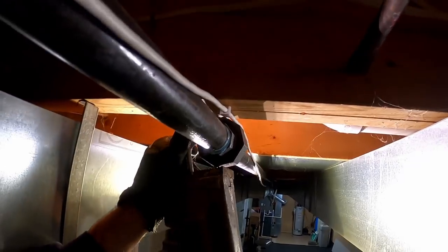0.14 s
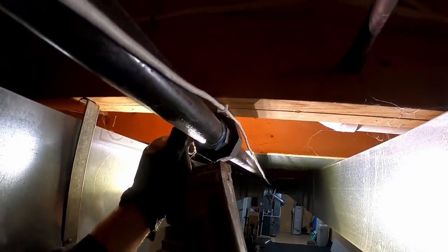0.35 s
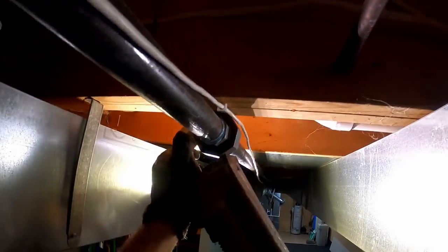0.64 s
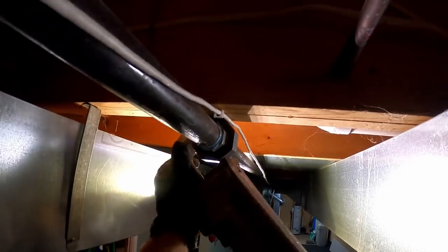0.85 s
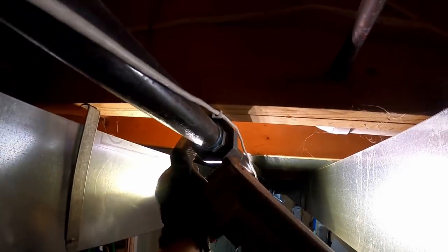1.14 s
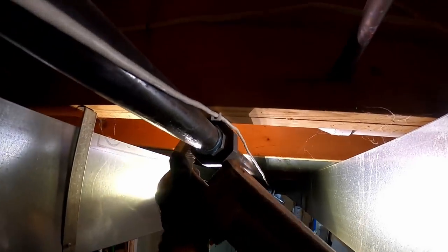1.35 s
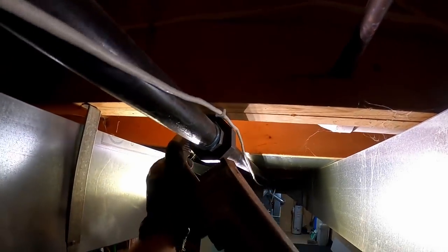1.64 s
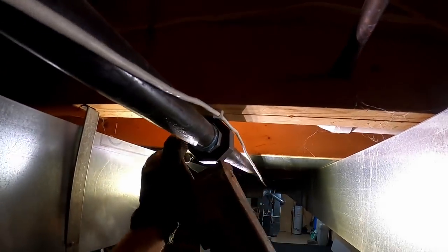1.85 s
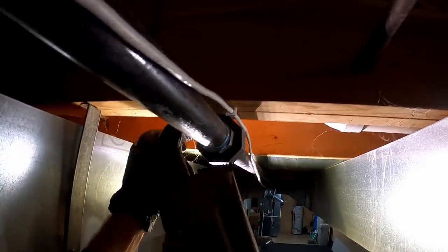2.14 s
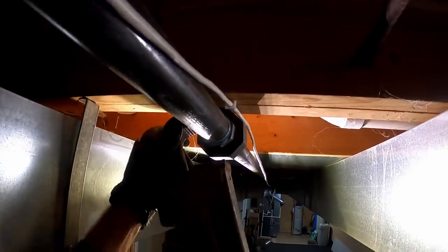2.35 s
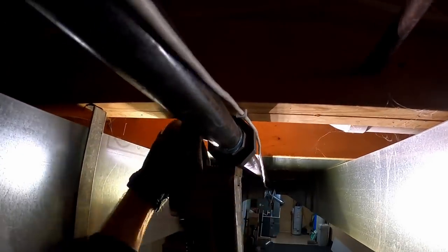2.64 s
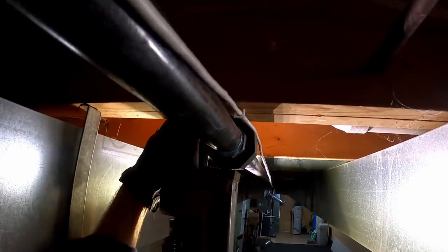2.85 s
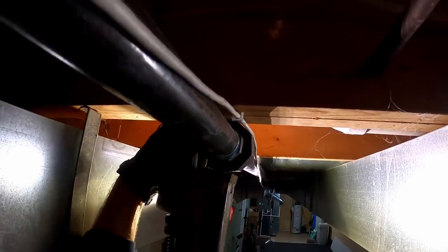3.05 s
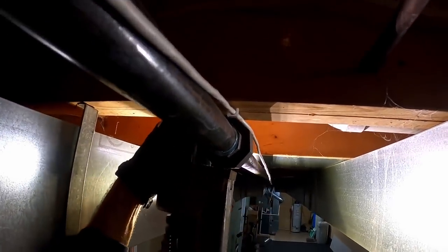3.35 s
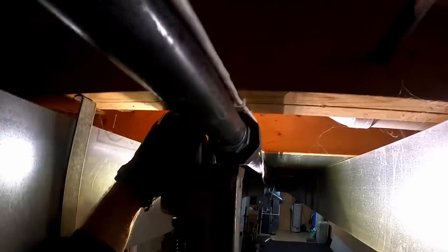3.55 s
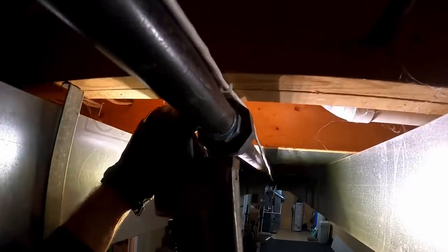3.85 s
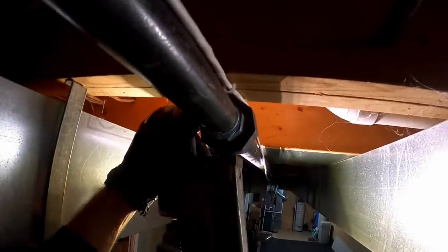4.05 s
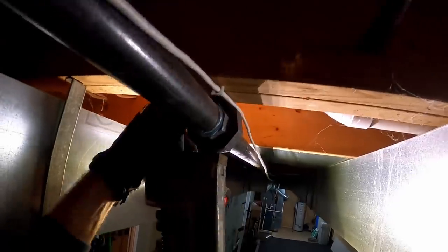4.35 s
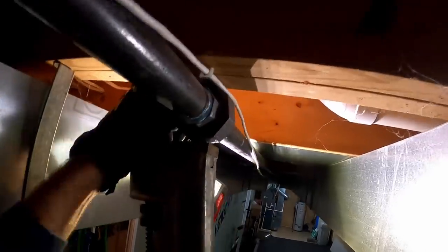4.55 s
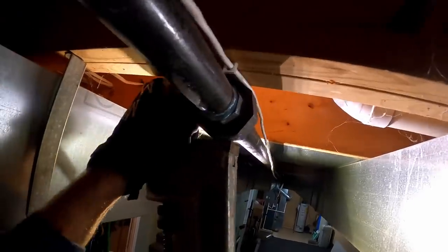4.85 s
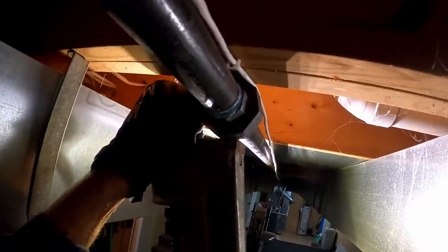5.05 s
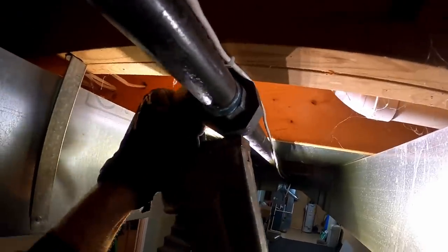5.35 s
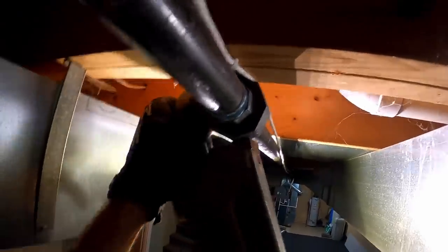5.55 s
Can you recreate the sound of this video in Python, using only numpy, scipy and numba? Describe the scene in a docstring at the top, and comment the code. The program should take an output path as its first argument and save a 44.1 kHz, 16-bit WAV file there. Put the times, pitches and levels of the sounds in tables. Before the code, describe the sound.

Close, dry stereo sound of wrench jaws on threaded pipe: an opening scrape, a stuttering squeak, a lull, then a sharp bite and ratchety grind. The loudest metal blows land just after the middle of the first half ends and shake the joists dully. Afterwards come sparse clicks, light scuffs, rough squeaks and glove rubbing over steady faint hiss.

```python
"""In a cramped loft, a pipe wrench works a threaded iron pipe between joists, close to a small stereo microphone.
Each pull shakes the joists low and dull: noise and sudden pushes ring the low modes of the timber.
Gloves rub along and the jaws rasp, scuff and knock: random grains and bursts ring wood and iron resonances.
The thread squeaks as it sticks and slips, built from harmonics of a wobbling pitch.
Short diffuse echoes answer; a steady hiss lies beneath and the image flutters between left and right."""
import sys
import numpy as np
from scipy import signal
from scipy.fft import rfft, irfft, next_fast_len
from scipy.io import wavfile
from scipy.ndimage import uniform_filter1d
from numba import njit

SR = 44100
rng = np.random.default_rng(int(sys.argv[2]) if len(sys.argv) > 2 else 0)


def materialize(psi):
    """Save the field psi as 16-bit PCM at rate SR to the path in sys.argv[1].

    A 1-D psi becomes a single channel; in a 2-D psi each row is a channel.
    """
    bounded = np.clip(np.atleast_2d(psi).T, -1, 1)
    quanta = np.round(bounded * 32767).astype(np.int16)
    wavfile.write(sys.argv[1], SR, quanta)


N = 250929
T = np.arange(N) / SR
MS = np.arange(0, N / SR + .002, .001)  # the same span in millisecond steps, in seconds
DRIFT = .018  # scale of the wander of the resonances, as a share of their pitch


def undb(db):
    """Decibels to an amplitude factor."""
    return 10 ** (np.asarray(db) / 20)


def unit(x):
    """Scale to an RMS of one."""
    return x / np.sqrt(np.mean(x ** 2))


def curve(table, index):
    """One column over time, joined by straight lines."""
    rows = np.array(table, float)
    return np.interp(T, rows[:, 0], rows[:, index])


def gate(table, fade_s=0.0052):
    """One while the table lasts, fading at both ends."""
    since_start, until_end = T - table[0][0], table[-1][0] - T
    return np.clip(np.minimum(since_start, until_end) / fade_s, 0, 1)


def swells(s, db, rise_s, hold_s, fade_s):
    """Power of each event once a millisecond: rise to the peak, hold, then a steady fade."""
    late = MS[:, None] - s
    # rises are kept within 2 to 500 ms per 30 dB, fades at 20 ms or more per 60 dB
    rise_db = -30 * late / np.clip(rise_s, .002, .5)
    fade_db = 60 * (late - hold_s) / np.maximum(fade_s, .02)
    below_db = np.clip(np.maximum(rise_db, fade_db), 0, 200)
    return undb(db - below_db) ** 2


def gain(power):
    """Overlapping events add in power; the amplitude follows at sample rate."""
    return np.interp(T, MS, np.sqrt(power.sum(axis=1)))


@njit
def svf(x, hz, width):
    """State-variable band-pass, gain 1 at a centre that may move."""
    y, b, l = np.empty(len(x)), 0., 0.  # output, band and low states
    for i in range(len(x)):
        g, k = np.tan(np.pi * hz[i] / SR), width / hz[i]
        v = (b + g * (x[i] + 1e-18 - l)) / (1 + g * (g + k))
        b, l, y[i] = 2 * v - b, l + 2 * g * v, k * v
    return y


def body(x, modes, stretch=None, steep=False):
    """Sum of resonances, all scaled by a common stretch; steep ones pass a second, wider filter."""
    out = 0
    for k, (hz, width, db) in enumerate(modes):
        centre = np.full(len(x), 1. * hz) if stretch is None else np.clip(hz * stretch, 20, SR / 2.5)
        y = svf(x, centre, 1. * width)
        if steep:
            y = svf(y, centre, 1.76 * width)
        out = out + (-1) ** k * undb(db) * y  # neighbours alternate in sign
    return out


def tilted(modes, tilt_db):
    """The same modes, brighter or duller by dB per octave from 2 kHz."""
    return [(hz, width, db + tilt_db * np.log2(hz / 2000)) for hz, width, db in modes]


def walk(rate):
    """Random levels held 1 / rate s and slewed twice; spread near 1."""
    k = int(SR / rate)
    held = np.repeat(rng.standard_normal(N // k + 1), k)
    return 1.26 * uniform_filter1d(uniform_filter1d(held, k), k)[:N]


def grains(rate, spread_db, flicker_db):
    """Tiny slips of rough surfaces: random clicks (rate per s) of uneven size whose strength flickers."""
    hit = rng.random(N) < rate / SR
    size = undb(spread_db * rng.exponential(size=N)) * rng.standard_normal(N)
    return unit(hit * size * undb(flicker_db * walk(40)))


def steady_hiss():
    """Steady broad noise round 2.5 kHz, unrelated left and right."""
    level_db = -67.5  # before the filter
    noise = rng.standard_normal(2 * N)
    return undb(level_db) * svf(noise, np.full(2 * N, 2500.), 3600.0).reshape(2, N)


def joists():
    """Heaves shake each low timber mode on its own; jolts ring them all over a slowly swelling rumble."""
    # Low modes of the timber frame. Each row: centre in Hz, width in Hz, level in dB.
    joist_modes = [(64.3, 17.7, 1), (82.7, 8.2, 0.5), (97.4, 19.3, 2.5), (122.4, 18.7, 5), (150.2, 23, -3),
                   (170.8, 16.3, 0.5), (204.6, 30.3, -3)]
    # Heaves on the handle. Each row: peak in seconds, level at 120 Hz in dB, hold in seconds,
    # fade in seconds per 60 dB, tilt in dB per octave.
    heave_rows = [(0, -30, 0.04, 2.5, -1.5), (0.523, -26.5, 0.011, 1.3, -5.5),
                  (0.894, -37.5, 0.026, 2.5, -2), (1.637, -27, 0.099, 1, 10.5),
                  (1.797, -22, 0.072, 1.06, 0), (2.05, -23.5, 0.02, 0.5, 1.5),
                  (2.132, -24, 0.069, 0.5, -3.5), (2.317, -27.5, 0.073, 1.4, 3), (2.609, -18, 0.16, 1, 2),
                  (2.868, -21, 0.026, 2, 0.5), (3.832, -46.5, 0.12, 5.5, 5.5), (4.489, -37, 0.021, 1.6, 2),
                  (4.815, -21, 0.029, 0.19, -8.5), (4.872, -26, 0.077, 0.93, -11),
                  (5.198, -41, 0.36, 2.5, -3.5)]
    # Heavy jolts into the joists. Each row: time of the push in seconds, peak in dB.
    jolt_rows = [(0.514, -19), (1.631, -23), (2.042, -20), (2.316, -20.5), (2.608, -11), (2.655, -15.5),
                 (2.686, -18.5), (2.751, -21), (2.9, -9.5), (3.828, -35.5), (4.81, -23), (4.857, -30.5)]
    heave_rise_s = 0.035  # per 30 dB
    rumble_hz, rumble_width_hz, rumble_db = 53, 40, -43

    s, level_db, hold_s, fade_s, tilt_db = np.transpose(heave_rows)
    modes = [body(rng.standard_normal(N), [mode], steep=True) for mode in joist_modes]
    shake = 0
    for y, (hz, width, db) in zip(modes, joist_modes):
        mode_db = level_db + tilt_db * np.log2(hz / 120)
        shake = shake + y * gain(swells(s, mode_db, heave_rise_s, hold_s, fade_s))
    shake = shake / np.std(sum(modes))

    push, t = np.zeros(N), np.arange(SR // 4) / SR
    for s, db in jolt_rows:
        push[int(s * SR)] = undb(db)
    ring = sum(undb(db) * np.sin(2 * np.pi * hz * t) * np.exp(-np.pi * 1.5 * width * t)
               for hz, width, db in joist_modes)
    # the push reaches the timber 5 ms late and lasts about 3 ms
    ring = uniform_filter1d(np.r_[np.zeros(SR // 200), ring], size=120)
    jolts = signal.fftconvolve(push, ring / np.abs(ring).max())[:N]

    rumble = body(rng.standard_normal(N), [(rumble_hz, rumble_width_hz, 0)], steep=True)
    rumble = unit(rumble * undb(2.0 * walk(3.4))) * undb(rumble_db)
    return shake + jolts + rumble


def rubbing():
    """Gloves and jaws rub wood and iron: grains ring dull wood, gritty iron and its finer treble."""
    # Resonances of wood, iron and iron treble. Each row: centre in Hz, width in Hz, level in dB.
    wood_modes = [(276, 125, 3.5), (426, 136, 2), (545, 122, 2), (700, 360, -6)]
    grit_modes = [(936, 200, -1.5), (1200, 363, 3.5), (1713, 390, 0), (2330, 990, -6.5)]
    treble_modes = [(2980, 1130, 1), (4130, 2640, -1.5), (6770, 2400, -10), (8780, 1050, -13),
                    (12000, 7100, -29.5)]
    # Gloves and handle drag on the wood. Each row: peak in seconds, level in dB,
    # rise in seconds per 30 dB, hold in seconds, fade in seconds per 60 dB.
    drag_rows = [(.01, -43.5, 3.9, 0, 0.9), (0.56, -56, 0.1, 0.16, 1), (.68, -47.5, 2, 0.0037, 0.75),
                 (0.901, -42.5, 0.06, 0.087, 0.28), (1.06, -56, 0.5, 0.0034, 2),
                 (1.67, -33.5, 0.1, 0.26, 0.9), (1.998, -43.5, 1, 0.21, 1), (2.314, -45, -0.2, 0.044, 1.5),
                 (2.607, -28, 0.02, 0.2, 0.92), (3.008, -39, .5, 0.0078, 1.08), (3.955, -51, 0.2, 0.041, 1),
                 (4.41, -49, 0.14, 0.05, 1), (5.193, -59.5, 0.3, 0.047, 0.5),
                 (5.39, -52.5, -0.1, 0.077, 1.5), (5.688, -39.5, 0.1, .02, 4)]
    # The jaws grate on the iron. Each row: peak in seconds, level in dB, treble level in dB,
    # rise in seconds per 30 dB, hold in seconds, fade in seconds per 60 dB.
    grate_rows = [(.01, -37.5, -42, 3.2, 0, 0.8), (0.243, -49, -59, 1.5, 0.024, 0.7),
                  (0.519, -51, -59, 0.1, 0.025, 2), (0.666, -42, -62, 0, 0.0055, 0.42),
                  (.92, -60, -77, 1.5, 0, 1.5), (1.607, -55, -64, -0.02, 0.14, 1),
                  (1.67, -36, -48, 0.04, 0.15, 1.42), (2.116, -48, -48, 3, 0.13, .5),
                  (2.329, -50, -54, -2, 0.02, -0.95), (2.65, -32, -50, 0.07, 0.05, .5),
                  (2.76, -30, -72, 0.3, 0.0025, .5), (2.893, -45, -51, 0.5, 0.019, 0.1),
                  (2.993, -52.5, -61.5, 0.3, 0.038, 2), (3.256, -55, -64.5, 1.5, 0.083, 1.5),
                  (3.862, -61, -63, 0, 0.11, 0), (4.13, -66.5, -77.5, 0.6, 0, 8),
                  (4.518, -51, -55.5, 0.16, 0.041, 1.5), (4.704, -59, -55, -0.3, 0.069, 0.6),
                  (5.209, -56.5, -76, -0.1, 0.029, 1), (5.39, -61, -65, 0, 0.011, 2),
                  (5.593, -60, -54.5, 0.07, 0.031, 0)]

    s, db, treble_db, *shape = np.transpose(grate_rows)
    wood = unit(body(grains(2500, 1.0, 1.9), wood_modes, steep=True))
    wood = wood * gain(swells(*np.transpose(drag_rows)))
    iron = unit(body(grains(3000, 0.43, 0.96), grit_modes, steep=True)) * gain(swells(s, db, *shape))
    treble = unit(body(grains(6000, 0.74, 1.85), treble_modes, steep=True))
    treble = treble * gain(swells(s, treble_db, *shape))
    return wood + iron + treble


def hum():
    """Light contact keeps two modes of the released pipe sounding faintly: noise through resonances."""
    # Each row: peak in seconds, level in dB, rise in seconds per 30 dB, hold in seconds,
    # fade in seconds per 60 dB.
    hum_rows = [(2.737, -42.5, -0.6, 0.052, 0.54), (3.245, -59, 1.1, 0.21, 0.75)]
    # Pipe modes. Each row: centre in Hz, width in Hz, level in dB.
    hum_modes = [(1773, 110, 0.5), (3600, 120, -10)]
    noise = rng.standard_normal(N)
    return unit(body(noise, hum_modes, steep=True)) * gain(swells(*np.transpose(hum_rows)))


def scuffs():
    """The jaws land and scuff to a halt: sudden grit dies away through the pipe's broad modes."""
    # Each row: start in seconds, level in dB (8.5 dB is taken off below), fade in seconds per 60 dB,
    # tilt in dB per octave.
    scuff_rows = [(.0074, -19.5, 0.25, 5), (.676, -28.5, 0.31, 3.5), (2.191, -31.5, 0.51, 3.5),
                  (2.313, -26.5, 0.4, -1.5), (2.884, -27.5, 0.27, -1), (2.971, -41.5, 0.22, 9),
                  (3.04, -37, 0.24, -1), (3.254, -38, 0.32, 3), (3.506, -46, 0.41, 5),
                  (4.119, -35.5, 0.48, -0.5), (4.309, -39, 0.28, -4), (4.445, -48.5, 1, 9),
                  (5.1753, -33.5, 0.22, -2), (5.375, -47.5, 0.98, -2.5), (5.5922, -38, 0.38, -1)]
    # Broad pipe modes. Each row: centre in Hz, width in Hz, level in dB before the tilt.
    scuff_modes = [(1020, 295, 8), (1530, 630, -3.5), (2100, 520, 0), (2920, 1500, -15.5), (4080, 1020, -9),
                   (6740, 3340, -23)]
    out, t = np.zeros(N + SR), np.arange(SR // 2) / SR
    chance = rng.standard_normal((len(scuff_rows), len(t)))
    for (s, db, fade_s, tilt_db), noise in zip(scuff_rows, chance):
        grit = noise * np.abs(noise)  # squaring makes the grit uneven
        rub = unit(body(grit, tilted(scuff_modes, tilt_db), steep=True))
        onset = np.minimum(t / 0.003, 1)
        i = int(s * SR)
        out[i:i + len(t)] += rub * undb(db - 8.5 - 60 * t / max(fade_s, .02)) * onset
    return out[:N]


def rasp():
    """The adjusting nut rasps: short dense grains ring the nut and jaw."""
    # Each row: peak in seconds, level in dB, rise in seconds per 30 dB, hold in seconds,
    # fade in seconds per 60 dB.
    rasp_rows = [(3.856, -48.5, 0.06, 0.07, 0.5), (3.912, -49.5, 0.1, 0.065, 0.3)]
    # Nut and jaw modes. Each row: centre in Hz, width in Hz, level in dB.
    rasp_modes = [(1400, 670, -9.5), (2070, 160, -3), (2664, 120, 3.5), (3410, 290, -6.5), (4080, 390, -15),
                  (5630, 630, -15), (6760, 370, -10.5), (7900, 4900, -24.5)]
    ringing = body(grains(6000, 1.2, 3.4), rasp_modes, 1 + DRIFT * walk(40))
    return unit(ringing) * gain(swells(*np.transpose(rasp_rows)))


def slide():
    """Teeth grind round the pipe; resonances jump at the bite, and the free span climbs as the grip tightens."""
    # The jaws slide round the pipe. Each row: time in seconds, level in dB (2.5 dB is taken off below),
    # extra level of the free span in dB.
    slide_rows = [(1.56, -64, -9), (1.632, -46.5, 2.5), (1.652, -26, 8.5), (1.7, -22.5, 5.5),
                  (1.74, -21.5, 0.5), (1.788, -25.5, 0), (1.84, -26, 0.5), (1.95, -30, 2),
                  (2.142, -37.5, 1.5), (2.248, -38.5, 2), (2.31, -44.5, -4), (2.42, -61, -3)]
    # Each row: centre in Hz when the free span is at reference_hz, width in Hz, level in dB,
    # share of the climb that it follows.
    slide_modes = [(794, 230, 1, 0.0051), (1100, 480, -4, 0.013), (1890, 340, -9.5, 0), (2290, 150, 1, 0),
                   (2590, 220, -1.5, 0), (3100, 500, -18, 0), (3600, 110, -15.5, 0),
                   (3960, 260, -8.5, 0.0065), (4600, 520, -21.5, 0), (5870, 1500, -21, 0),
                   (7100, 1000, -27.5, 0)]
    reference_hz = 1560
    bite_s, loose_hz, bite_hz, bite_takes_s, climb_hz_per_s = 1.66, 1475, 77, .03, 410
    span_width_hz, span_db, waver_db = 85., 5, 2.5
    # a thin hiss as the teeth skid before they bite: peak in seconds, level in dB,
    # rise in seconds per 30 dB, hold in seconds, fade in seconds per 60 dB
    skid = (1.652, -56, .09, .02, .12)
    skid_mode = (7750, 600, 0)  # centre in Hz, width in Hz, level in dB

    late = np.maximum(T - bite_s, 0)
    bite = loose_hz + bite_hz * (1 - np.exp(-late / bite_takes_s))
    climb = climb_hz_per_s * np.minimum(late, 1)
    grind = grains(4500, 0.75, 0.8)
    tone = 0
    for k, (*mode, share) in enumerate(slide_modes):
        # each resonance wavers on its own in pitch and level
        stretch = (bite + share * climb) / reference_hz * (1 + DRIFT * walk(29.95))
        y = body(grind, [mode], stretch, steep=True) * undb(waver_db * walk(24.9))
        tone = tone + (-1) ** k * y
    span_hz = (bite + climb) * (1 + DRIFT / 2 * walk(29.7))
    span = svf(grind, span_hz, span_width_hz) * undb(span_db + curve(slide_rows, index=2))
    hiss = unit(body(rng.standard_normal(N), [skid_mode], steep=True)) * gain(swells(*np.transpose([skid])))
    level = undb(curve(slide_rows, index=1) - 2.5) * gate(slide_rows)
    return (tone + span) / np.std(tone) * level + hiss


def squeaks(wobble=0.05, throb_db=4, haze=0.2):
    """Thread stick-slip locked near one mode: roughness wobbles the pitch and throbs the grip."""
    # Each row: peak in seconds, pitch in Hz, level in dB, second partial level in dB, roughness 0-1,
    # rise in seconds per 30 dB, hold in seconds, fade in seconds per 60 dB.
    squeak_rows = [(.218, 1160, -47.5, -64, 0.35, -0.43, 0.042, .5),
                   (0.472, 1116, -37, -52.5, 0.34, -0.12, 0.016, 0.36),
                   (0.487, 1187, -31, -48.5, 0.44, -0.04, 0.0063, 0.31),
                   (0.507, 1191, -36, -57, .4, -0.02, 0.0074, 0.3),
                   (0.555, 1165, -37, -54, 0.9, -0.16, 0.025, -0.04),
                   (0.594, 1152, -36.5, -63, .6, 0, 0.021, 0.12),
                   (1.592, 1215, -47, -69, .5, 0.015, 0.035, .2),
                   (4.493, 1176, -37.5, -57, 0.27, 0, 0.033, -0.08),
                   (4.55, 1149, -36, -56, 0.89, 0, 0.02, -0.21),
                   (4.628, 1139, -42, -58, 0.37, 0.3, 0.016, 0.07),
                   (4.694, 1171, -52, -65, .6, -0.5, 0.079, 0.6),
                   (4.825, 1086, -35, -55.5, 0.2, -0.1, 0.046, 0.19),
                   (4.915, 1075, -46.5, -70, 0.65, 0, .02, 0.15),
                   (4.964, 1080, -58, -85, 0.8, -0.1, 0.0035, 1)]
    # Upper partials. Each row: multiple of the pitch, level in dB relative to the second partial.
    upper_partials = [(3, -12), (4, -19)]
    scoop_hz_per_s, sag_hz_per_s = 1200, 60  # the pitch scoops up to the peak, then sags
    upper_share = 0.76  # overtones hold and fade in this share of the time
    beat_hz, beat_depth = 80, 1.2  # a neighbouring mode beats against a rough squeak

    waver, grip, grain = walk(500), np.minimum(walk(100), .5), walk(500)
    s, hz, db, second_db, rough, rise_s, hold_s, fade_s = np.transpose(squeak_rows)
    power, late = swells(s, db, rise_s, hold_s, fade_s), MS[:, None] - s
    share = power / power.sum(axis=1, keepdims=True)  # the strongest slip sets pitch and roughness
    drop_hz = np.clip(np.maximum(-scoop_hz_per_s * late, sag_hz_per_s * late), 0, 100)
    pitch = np.interp(T, MS, (share * (hz - drop_hz)).sum(axis=1))
    rough = np.interp(T, MS, (share * np.clip(rough, 0, 1)).sum(axis=1))
    phase = 2 * np.pi * np.cumsum(pitch * (1 + wobble * rough * waver)) / SR

    # the swing saturates, so the throb dips deep but peaks flat; fast grip noise hazes the lines
    throb = undb(throb_db * rough * grip) * (1 + haze * rough * grain)
    beat_phase = 2 * np.pi * np.cumsum(beat_hz * (1 + .3 * walk(30))) / SR
    throb = throb * (1 + beat_depth * rough * np.sin(beat_phase))

    upper = np.sin(2 * phase) + sum(undb(db) * np.sin(int(k) * phase) for k, db in upper_partials)
    upper = upper * (1 + 1.3 * rough * walk(400))
    second = gain(swells(s, second_db, rise_s, upper_share * hold_s, upper_share * fade_s))
    return np.sqrt(2) * throb * (gain(power) * np.sin(phase) + second * upper)


def knocks(chatter=2.1, lead=1.05):
    """Each blow is a brief chatter that builds up and rings the jaw modes, plus a dry crack round its centre."""
    # Jaw knocks and ticks. Each row: time in seconds, peak of the ring in dB, crack centre in Hz,
    # crack in dB over the ring, ring in seconds per 60 dB of added fade, tilt in dB per octave.
    knock_rows = [(0.1251, -31.5, 3860, -5.5, 0.028, 2), (0.4124, -41, 3950, -2, 0.012, 3.5),
                  (0.635, -43, 3550, -0.5, 0.027, -8), (1.603, -54, 8000, 5, 0.016, 9),
                  (1.673, -16.5, 730, -0.5, 0.03, -14), (1.7408, -23, 2000, -3.5, 0.014, -3),
                  (2.154, -37.5, 3490, -0.5, 0.043, -3), (2.239, -28, 950, 0, 0.037, 3),
                  (2.605, -22.5, 1135, -3, 0.03, -2.5), (2.608, -15.5, 4530, -3.5, 0.031, 3),
                  (2.6523, -9, 1020, -3.5, 0.026, -1.5), (2.655, -12, 3380, -9, .025, 3),
                  (2.721, -8, 2310, -5, 0.032, 3), (2.886, -30.5, 1900, 0.5, .025, -4),
                  (2.896, -27.5, 2430, -7, 0.03, 3), (2.99, -37.5, 1000, 1.5, 0.031, -10),
                  (3.634, -50.5, 2180, -1, 0.016, 11), (3.707, -40, 2850, 3.5, 0.013, 2),
                  (3.761, -48.5, 2920, 2, 0.026, 3), (4.105, -57, 8050, 0, 0.015, 2),
                  (4.2015, -29, 1830, -2, 0.012, 2.5), (4.291, -49.5, 2600, 0, 0.012, 3),
                  (4.5051, -29, 2370, -18, 0.017, 6), (4.602, -32.5, 3960, -3, 0.016, 5.5),
                  (5.254, -45, 2580, 12, 0.013, -8), (5.2728, -37, 5900, 8.5, 0.0093, 12),
                  (5.2747, -42, 7700, 8, 0.01, 15), (5.39, -55, 4650, -3, 0.023, 15),
                  (5.485, -59, 6960, -5, 0.016, 18), (5.5215, -54, 3870, 0, 0.033, 10.5),
                  (5.681, -35.5, 2100, -4, 0.048, -0.5)]
    # Each row: centre in Hz, width in Hz, level in dB before the tilt.
    jaw_modes = [(1026, 130, 4.5), (1430, 200, 4), (2246, 97, 7), (3030, 360, -5.5), (3470, 144, 2),
                 (4670, 90, -10), (4880, 130, -5), (5660, 710, -19), (7000, 360, -22), (8570, 190, -19),
                 (10870, 1400, -34)]
    out, t = np.zeros(N + SR), np.arange(SR // 5) / SR
    chance = rng.standard_normal((len(knock_rows), len(t)))
    for (s, db, hz, crack_db, ring_s, tilt_db), noise in zip(knock_rows, chance):
        ring_s = max(ring_s, .004)
        chatter_s = chatter * ring_s ** 2  # blows that ring longer chatter longer
        taps = noise * t ** 2 * np.exp(-t / chatter_s)
        fade = undb(-60 * t / ring_s)
        ring = body(taps, tilted(jaw_modes, tilt_db)) * fade
        crack = body(taps * fade, [(hz, 6 / ring_s + 0.094 * hz, 0)], steep=True)
        blow = ring / np.abs(ring).max() + undb(crack_db) * crack / np.abs(crack).max()
        i = int((s - lead * chatter_s) * SR)  # start early, as the chatter builds up
        out[i:i + len(t)] += blow * undb(db)
    return out[:N]


def loft(x):
    """Short diffuse echoes of the boards, unrelated left and right, with bass and high treble reduced."""
    level_db, t60_s, low_hz, high_hz = -7.5, 0.092, 1190, 5000  # level before the band-pass
    t = np.arange(SR // 3) / SR
    tail = rng.standard_normal((2, len(t))) * undb(-60 * t / t60_s)
    tail = tail / np.sqrt(np.sum(tail ** 2, axis=1, keepdims=True))
    tail = signal.sosfilt(signal.butter(1, [low_hz, high_hz], "band", fs=SR, output="sos"), tail)
    return undb(level_db) * signal.fftconvolve(x[None], tail, axes=1)[:, :N]


def ports(x):
    """Two close microphone ports differ in colour and phase, half the difference on each side."""
    # Each row: frequency in Hz, left minus right in dB.
    balance_rows = [(60, 1.5), (110, 0), (200, -0.5), (380, 0.5), (700, 1.5), (1290, 2), (2380, 4),
                    (4400, 1.5), (8120, 1), (15000, -7)]
    # Each row: frequency in Hz, phase by which left leads in radians.
    phase_rows = [(100, -0.027), (1000, -0.46), (2580, -0.62), (4300, -0.82), (6200, -0.45), (9000, -.05)]
    size = next_fast_len(N)
    octave = np.log2(np.arange(size // 2 + 1) * SR / size + 1)  # the added 1 Hz keeps the log finite
    balance_hz, balance_db = np.transpose(balance_rows)
    phase_hz, lead = np.transpose(phase_rows)
    balance_db = np.interp(octave, np.log2(balance_hz), balance_db)
    lead = np.interp(octave, np.log2(phase_hz), lead)
    half = undb(balance_db / 2) * np.exp(.5j * lead)
    return irfft(rfft(x, size) * np.array([half, 1 / half]), size)[:, :N]


def flutter(x):
    """The image flutters quickly between left and right, most in the treble."""
    treble_hz, treble_db, whole_db = 6000, 0, -14.5
    treble = signal.sosfilt(signal.butter(2, treble_hz, "high", fs=SR, output="sos"), x)
    side = (undb(treble_db) * treble + undb(whole_db) * x) * walk(180)
    return np.array([side, -side])


def scene():
    """The work passes ports, echoes and flutter; the joists pass only the ports; hiss is added directly."""
    work = rubbing() + hum() + scuffs() + rasp() + slide() + squeaks() + knocks()
    return steady_hiss() + ports(work + joists()) + loft(work) + flutter(work)


def record(dry):
    """The microphone rounds the loudest peaks, dulls the highest octave and cuts the top."""
    ceiling, dull_hz, top_hz = 0.53, 11500, 15600  # ceiling as a share of full scale
    rounded = ceiling * np.tanh(dry / ceiling)
    soft = signal.sosfilt(signal.butter(2, dull_hz, fs=SR, output="sos"), rounded)
    return signal.sosfilt(signal.ellip(8, .2, 70, top_hz, fs=SR, output="sos"), soft)


dry = scene()
out = record(dry)
materialize(out)
```